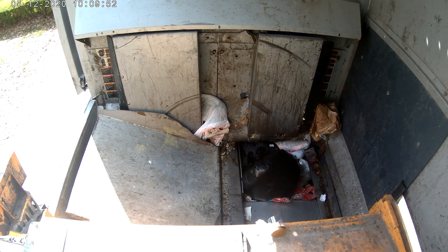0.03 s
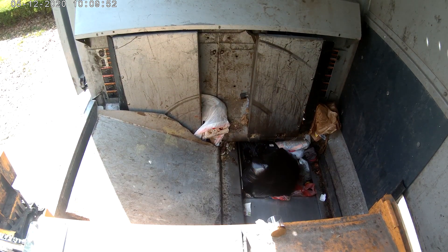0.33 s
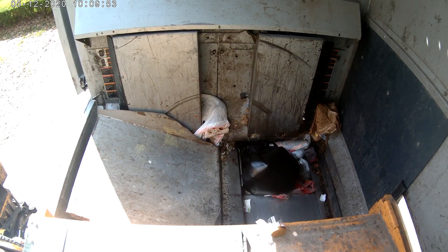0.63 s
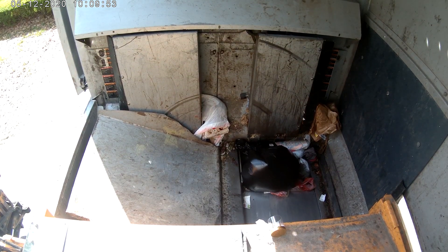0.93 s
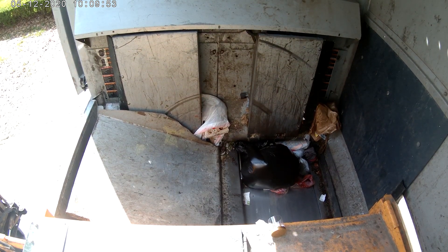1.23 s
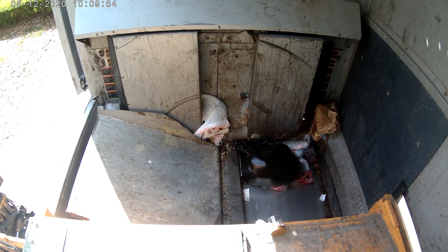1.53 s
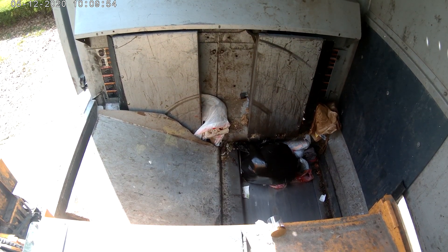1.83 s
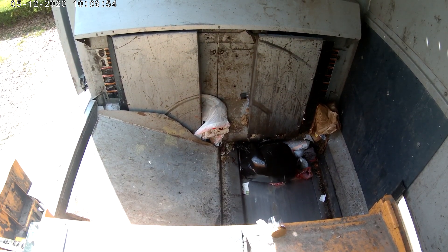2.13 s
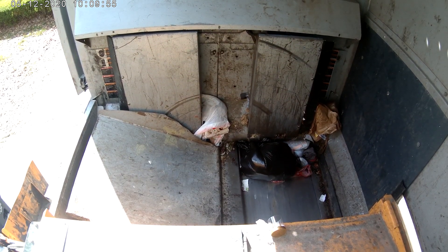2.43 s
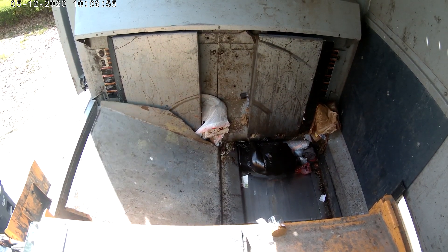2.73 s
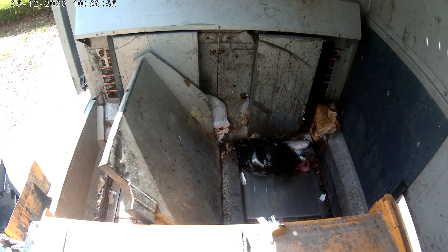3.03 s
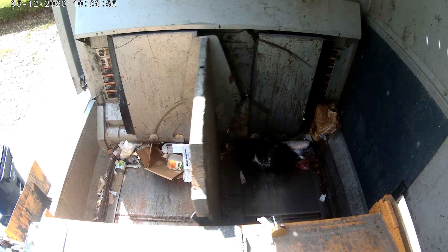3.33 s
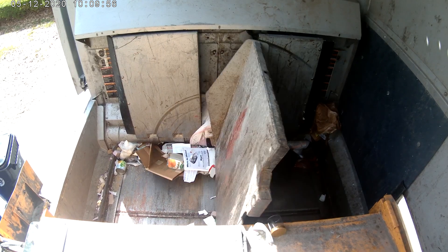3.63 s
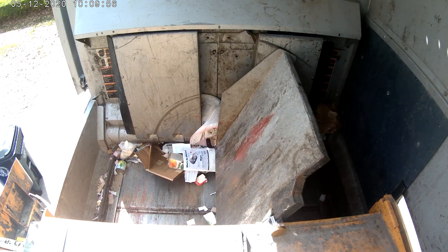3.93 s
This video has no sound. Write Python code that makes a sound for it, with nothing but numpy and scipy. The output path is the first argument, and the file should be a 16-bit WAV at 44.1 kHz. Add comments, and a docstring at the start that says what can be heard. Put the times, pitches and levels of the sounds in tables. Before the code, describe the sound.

A garbage truck's diesel engine throbs throughout, heard slightly muffled from inside the hopper. A steel panel knocks lightly, then slams heavily at about 1.2 seconds as the engine briefly rises. A pump whines, the walls boom and a loose plate buzzes. From 2.5 seconds the panel clatters with ringing knocks, loudest around 2.8, continuing to the end at 4 seconds over faint scraping rubbish and a growing hydraulic whistle.

```python
"""A diesel engine throbs while a steel panel knocks, slams once and clatters inside a garbage truck.
Oil under pressure swings the panel across the hopper, the steel bin that holds the waste.
The pump whines, a valve whistles, a loose plate buzzes, the walls boom and rubbish scrapes the floor.
A camera microphone inside the hopper misses the high treble and overloads on loud peaks."""
import sys
import numpy as np
from scipy import signal
from scipy.fft import rfft, irfft
from scipy.io import wavfile

SR = 44100
rng = np.random.default_rng(int(sys.argv[2]) if len(sys.argv) > 2 else 0)


def int16_out(signal):
    """Quantize to a 16-bit WAV file."""
    q = np.round(np.clip(np.atleast_2d(signal).T, -1, 1) * 32767)
    wavfile.write(sys.argv[1], SR, q.astype(np.int16))


N = 176400
TIME = np.arange(N) / SR


def from_db(db):
    """Turn decibels into a volume multiplier."""
    return 10 ** (np.asarray(db) / 20)


def unit_level(x):
    """Scale a signal so its average strength (rms) is 1."""
    return x / np.sqrt(np.mean(x ** 2) + 1e-20)


def in_time(rows):
    """Join (time [s], value) points with straight lines."""
    return np.interp(TIME, *np.transpose(rows))


def coloured(x, colour):
    """Shape a signal's bass and treble by (frequency [Hz], level [dB]) points, at strength 1."""
    hz, db = np.transpose(colour)
    bins = np.arange(N // 2 + 1) * SR / N + 1e-3
    edge_fade = 1 / (1 + (hz[0] / bins / 2) ** 4) / (1 + (bins / hz[-1] / 2) ** 4)
    gain = from_db(np.interp(np.log(bins), np.log(hz), db))
    return unit_level(irfft(rfft(x) * edge_fade * gain, N))


def noise(colour):
    """Noise with the given balance of bass and treble."""
    return coloured(rng.standard_normal(N), colour)


def drift(rate_hz):
    """A slow random wander, typically about 1 in size."""
    r = np.exp(-80 * np.pi * rate_hz / SR)
    slow = signal.lfilter([1], [1, -2 * r, r * r], rng.standard_normal(N // 40 + 2002))[2000:]
    return np.interp(np.arange(N) / 40, np.arange(len(slow)), unit_level(slow))


def decays(starts, dbs, fades):
    """A volume curve that jumps at each start; each jump dies away by 60 dB in its fade time."""
    out = np.zeros(N)
    for start, db, fade in np.broadcast(starts, dbs, fades):
        part = out[int(start * SR):int((start + 2 * fade) * SR)]
        part += from_db(db) * np.exp(-np.log(1000) * TIME[:len(part)] / fade)
    return out


def struck(starts, dbs, notes, spots_hz=None, contact_s=.012, chatter=.53):
    """Each blow is a click and a brief chatter that set the steel's natural notes ringing."""
    out = 0
    for hz, db, fade in notes:
        blow_db = dbs
        if spots_hz is not None:  # notes far from the struck spot's own pitch ring up to 12 dB less
            octaves_away = np.log2(hz / spots_hz)
            blow_db = dbs - 12 * (1 - np.exp(-(octaves_away / .12) ** 2))
        contact = decays(starts, blow_db, contact_s * np.log(1000)) / np.sqrt(contact_s * SR / 2)
        force = chatter * contact * rng.standard_normal(N)
        force[(starts * SR).astype(int)] += from_db(blow_db) * rng.choice([-1, 1], len(starts))
        r, w = np.exp(-np.log(1000) / (fade * SR)), 2 * np.pi * hz / SR
        ring = signal.lfilter([0, np.sin(w)], [1, -2 * r * np.cos(w), r * r], force + 1e-18)
        out = out + from_db(db) * ring
    return out


def rough_tone(hz, width_hz):
    """Noise narrowed twice around one pitch, at strength 1."""
    b, a = signal.iirpeak(hz, hz / width_hz / 2, fs=SR)
    once = signal.lfilter(b, a, rng.standard_normal(N))
    return unit_level(signal.lfilter(b, a, once))


def exhaust(firings, throb_waver_db=2.04, overtone_waver_db=5.5):
    """The engine's firings make a deep throb with unsteady higher tones above it."""
    # strength of the throb: (time [s], level [dB])
    throb = [(0, -15), (.3, -9), (.65, -13), (1.1, -11), (1.65, -6.5), (2.05, -13), (2.7, -12), (3.1, -9.5),
             (3.6, -15), (4, -12.5)]
    # higher tones: (multiple of the firing rate, level against the throb [dB])
    overtones = [(2, -15.5), (3, -12), (4, -17), (5, -17), (6, -20.5), (8, -21)]
    out = np.cos(2 * np.pi * firings) * from_db(throb_waver_db * drift(11))
    for multiple, db in overtones:
        wander = .12 * drift(7.8) + rng.random()
        gain = from_db(db + overtone_waver_db * drift(6.8))
        out = out + gain * np.cos(2 * np.pi * (multiple * firings + wander))
    return np.sqrt(2) * from_db(in_time(throb)) * out


def rumble():
    """The truck's body shakes with a low noise that swells and sinks."""
    # strength of the rumble: (time [s], level [dB])
    levels = [(0, -19.5), (1.0, -19.5), (1.25, -8.5), (1.65, -14), (2.1, -11), (2.4, -23), (2.6, -2.5),
              (2.8, -11), (3.15, -8.5), (3.5, -12.5), (4, -14)]
    # its tone: (frequency [Hz], level [dB])
    colour = [(15, -21.5), (35, -6), (50, 4.5), (80, -3), (120, 3), (165, -2.5), (205, -2), (250, -14.5),
              (400, -40)]
    return from_db(in_time(levels)) * noise(colour)


def machinery(firings, pulse_depth=.089, flutter_db=.95):
    """Working parts clatter in the hopper, pulsing as the engine fires."""
    # strength of the clatter: (time [s], level [dB])
    levels = [(0, -18.5), (1.0, -21), (1.15, -12.5), (1.55, -15), (1.9, -16), (2.4, -17.5), (2.6, -13.5),
              (2.78, -18.5), (3.1, -13.5), (3.5, -15), (4, -14.5)]
    # its tone: (frequency [Hz], level [dB])
    colour = [(150, -12.5), (270, -1), (330, 2.5), (405, 6), (490, -3), (570, -3), (660, -2.5), (760, 2.5),
              (865, 1), (960, -8), (1130, -4.5), (1450, -20.5), (2000, -20), (2550, -20), (3100, -38.5),
              (3700, -30.5)]
    pulsing = (1 + pulse_depth * np.cos(2 * np.pi * firings)) * from_db(flutter_db * drift(23))
    return from_db(in_time(levels)) * unit_level(pulsing * noise(colour))


def pump(load_start_s=1.0, load_full_s=1.765):
    """The pump's wavering whines grow louder as it takes the load."""
    # whines: (pitch [Hz], resting level [dB], working level [dB], pitch waver [Hz])
    whines = [(403, -43, -28, 7.56), (546.6, -26, -24, 1.6), (1087, -38.5, -32.5, 6.1)]
    out = 0
    for hz, rest_db, load_db, waver_hz in whines:
        db = np.interp(TIME, [load_start_s, load_full_s], [rest_db, load_db]) + 3 * drift(10)
        pitch = hz + waver_hz * drift(16)
        out = out + from_db(db) * np.sin(2 * np.pi * np.cumsum(pitch) / SR)
    return out


def valve():
    """Oil under pressure whistles through the valve as the panel swings."""
    # strength of the whistling: (time [s], level [dB])
    levels = [(1.2, -57), (1.8, -44), (2.8, -47), (3.4, -41), (3.8, -31), (4, -32.5)]
    # whistles: (pitch [Hz], rough width [Hz], relative level [dB])
    whistles = [(578, 50, 13), (2280, 31, -2.5), (2587, 67, -8), (3606, 58, -11), (3683, 15, -9.5)]
    whistling = sum(from_db(db) * rough_tone(hz, width) for hz, width, db in whistles)
    return from_db(in_time(levels)) * whistling


def loose_plate():
    """A loose plate buzzes under load."""
    # strength of the buzz: (time [s], level [dB])
    levels = [(0, -32.5), (1.6, -30.5), (1.98, -21), (2.4, -24), (2.8, -25), (3.3, -27), (4, -25)]
    return from_db(in_time(levels)) * rough_tone(hz=869, width_hz=21.8)


def wall_booms():
    """The truck's walls give deep booms that die away."""
    # booms: (time [s], level [dB], fade time [s])
    booms = [(1.45, -9.5, .8), (1.602, -9, 0.58), (2.151, -14, 0.55), (2.578, -11.5, 1)]
    # their tone: (frequency [Hz], level [dB])
    colour = [(22, -10), (40, -0.5), (52, 3), (68, -1), (100, -15)]
    return decays(*np.transpose(booms)) * noise(colour)


def scrape(grains_per_s=1300, spread_db=3):
    """Waste dragged over the steel floor makes a stream of tiny clicks."""
    # strength of the scraping: (time [s], level [dB])
    levels = [(0, -37), (1.0, -35), (1.15, -28.5), (1.5, -41), (1.88, -25), (2.15, -33), (2.8, -35.5),
              (3.15, -31.5), (3.6, -25.5), (4, -26)]
    # its tone: (frequency [Hz], level [dB])
    colour = [(300, -18.5), (700, 4), (1200, 15.5), (1600, 3), (2000, -11), (2500, -1.5), (3150, 4.5),
              (3650, 0), (4200, -12)]
    sizes = from_db(spread_db * np.minimum(rng.exponential(1, N), 5)) * rng.choice([-1, 1], N)
    clicks = sizes * (rng.random(N) < grains_per_s / SR)
    return from_db(in_time(levels)) * coloured(clicks, colour)


def panel_knocks(ring_gain_db=-5):
    """Each knock rings the panel, with a bright crack and a dull thud dying away in the hopper."""
    # knocks: (time [s], relative ring level [dB], crack level [dB], thud level [dB],
    # fade time of crack and thud [s], pitch of the struck spot [Hz])
    knocks = [(.082, -4.5, -19, -18, 0.15, 787), (.108, -19, -25, -10.5, 0.24, 870),
              (.322, -26, -39, -11.5, 0.14, 710), (.335, -4, -21, -15.5, 0.15, 802),
              (.592, -17, -30, -8, 0.16, 780), (1.04, -30, -47, -10, 0.11, 710),
              (1.078, -6.5, -40, -19.5, 0.16, 750), (1.564, -12, -16.5, -10.5, 0.7, 760),
              (1.684, -7, -18.5, -19, 0.32, 1110), (1.857, -8.5, -11.5, -26, 0.19, 795),
              (1.973, -5, -34, -35, 0.27, 880), (2.3, -19.5, -36, -4, 0.084, 764),
              (2.517, 0, -16, -7, 0.73, 866.6), (2.6, -7, -28, -10, 0.089, 745),
              (2.665, 2, -10, -11, 0.27, 890), (2.69, -7, -16, -23, .12, 786),
              (2.828, 4, -2, -15, .33, 756), (2.85, 3, -10.5, -19, .2, 890),
              (2.889, 0.5, -15, -12, 0.36, 720), (2.945, 2, -16, -12, 0.29, 780),
              (2.987, -7, -21, -11, 0.2, 900), (3.057, 2.5, -7, -8.5, 0.28, 820),
              (3.083, -14, -14, 1, 0.11, 808.3), (3.133, -24, -25, -11, 0.41, 1110),
              (3.285, -9, -26, -26, 0.18, 875), (3.41, -3, -26, -7.5, 0.16, 843),
              (3.527, -0.5, -24, -21, .2, 900), (3.665, -4, -26, -6, .15, 695),
              (3.784, -5, -27, -12, .15, 742), (3.896, -11, -9, -13, 0.22, 880)]
    # the panel's natural notes: (pitch [Hz], relative level [dB], fade time [s])
    notes = [(703, -3, 0.16), (743, 1.5, 0.067), (784, 0, 0.15), (875.2, 0, 0.28), (1011, -9.5, 0.53),
             (1107, -3.5, 0.22), (1320, -22, 0.11), (2197, -28.5, .14), (2460, -11, .14), (2610, -18, 0.36)]
    # tones of the crack and the thud: (frequency [Hz], level [dB])
    crack_colour = [(300, 9), (800, 21), (1100, 6), (1500, -5), (2000, -4.5), (2500, -7), (3100, -19.5),
                    (3800, -5.5)]
    thud_colour = [(40, -2.5), (110, -2), (180, 8), (260, -6.5), (410, 1.5), (520, -20), (900, -22),
                   (2500, -42.5)]
    starts, ring_db, crack_db, thud_db, fades, spots_hz = np.transpose(knocks)
    ring = struck(starts, ring_db + ring_gain_db, notes, spots_hz)
    crack = decays(starts, crack_db, fades) * noise(crack_colour)
    thud = decays(starts, thud_db, fades) * noise(thud_colour)
    return ring + crack + thud


def panel_slam(roar_db=-3.5, crack_db=-10.5):
    """A few quick, heavy blows shake the whole hopper: it rings, roars and gives a short crack."""
    # blows: (time [s], relative level [dB])
    blows = [(1.19, -10), (1.209, 2.5), (1.232, -2.5), (1.262, -2), (1.28, -9.5)]
    # the hopper's natural notes: (pitch [Hz], relative level [dB], fade time [s])
    notes = [(124.7, -9, 0.68), (205.2, -12.5, 0.67), (358, -20, 0.32), (402.4, -12, 0.56), (458, -7, 0.71),
             (555, -11, 0.88), (635.6, -9, .6), (1200, -17.5, 0.35), (2140, -32.5, 0.32)]
    # tones of the sheet steel's roar and crack: (frequency [Hz], level [dB])
    roar_colour = [(60, 6), (200, -0.5), (420, 4.5), (500, -4), (700, 1), (1000, -15), (1400, -22),
                   (2000, -23), (3500, -51.5)]
    crack_colour = [(400, -10.5), (900, 1.5), (1500, 4.5), (1900, -1), (2200, 1), (2900, -6), (3700, -5.5)]
    starts, db = np.transpose(blows)
    roar = decays(starts, db + roar_db, fades=.56) * noise(roar_colour)
    ring = struck(starts, db, notes)
    crack = decays(starts, db + crack_db, fades=.19) * noise(crack_colour)
    return ring + roar + crack


def scene():
    """Add up everything heard inside the hopper, as one channel."""
    # engine speed: (time [s], firing rate [Hz])
    speed = [(0, 35.4), (1.1, 35.6), (1.28, 40.3), (1.5, 35.8), (2.05, 32.8), (2.4, 34.6), (2.6, 39),
             (2.85, 36.1), (3.3, 32.6), (4, 33.2)]
    firings = np.cumsum(in_time(speed)) / SR - .164  # goes up by one at each firing
    engine = exhaust(firings) + rumble() + machinery(firings)
    background = engine + pump() + valve() + loose_plate() + wall_booms()
    return (background + scrape() + panel_knocks() + panel_slam())[None]


def record(dry, band_hz=3740, leak_db=-33.5, clip_level=.71, crackle_db=-7, hiss_db=-81):
    """The microphone loses the high treble and overloads; its crackle is dulled and faint hiss added."""
    narrow = signal.sosfilt(signal.ellip(10, .3, 70, band_hz, fs=SR, output="sos"), dry)
    leak = signal.sosfilt(signal.cheby1(10, 1, 4300, fs=SR, output="sos"), dry)
    clipped = np.clip(narrow + from_db(leak_db) * leak, -clip_level, clip_level)
    low = signal.sosfiltfilt(signal.butter(2, 3470, fs=SR, output="sos"), clipped)
    dulled = low + from_db(crackle_db) * (clipped - low)
    hiss = from_db(hiss_db) * rng.standard_normal(N)
    top_cut = signal.ellip(10, .1, 80, 15900, fs=SR, output="sos")
    return signal.sosfilt(top_cut, dulled + hiss)


dry = scene()
out = record(dry)
int16_out(out)
```